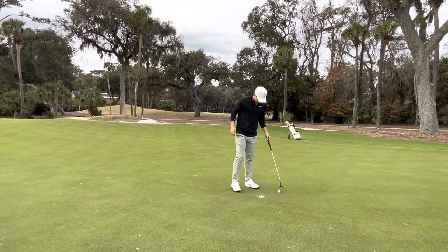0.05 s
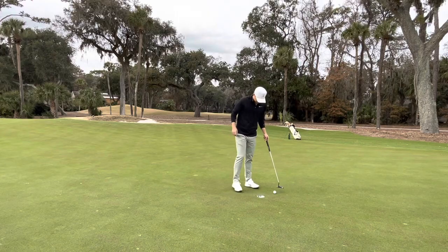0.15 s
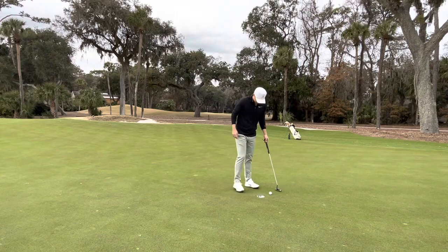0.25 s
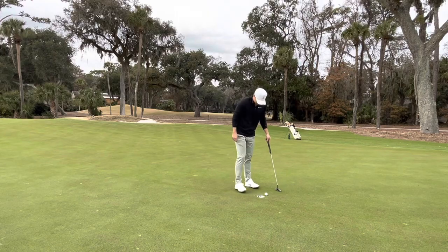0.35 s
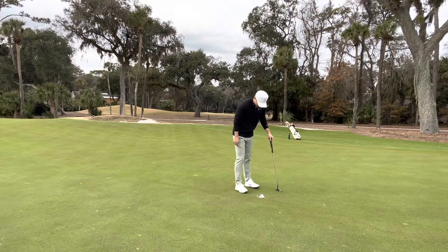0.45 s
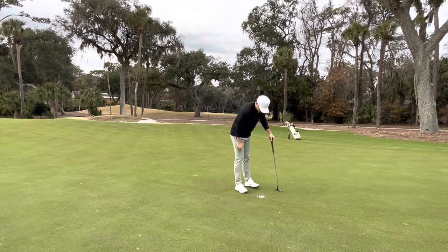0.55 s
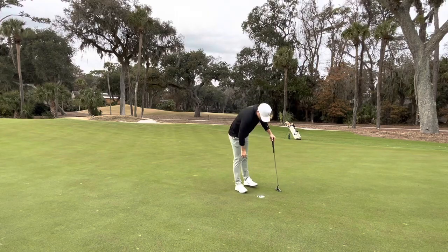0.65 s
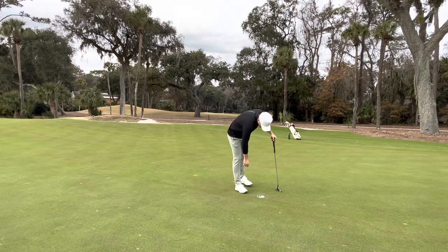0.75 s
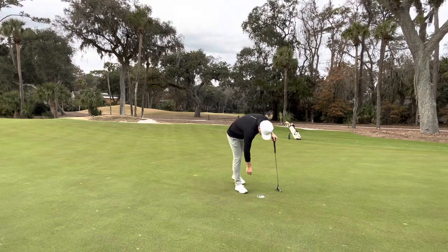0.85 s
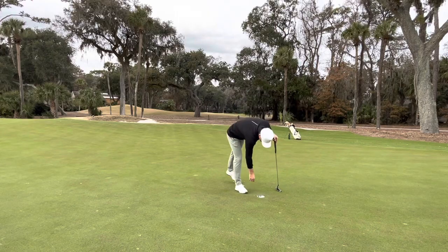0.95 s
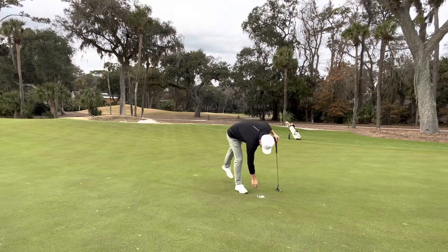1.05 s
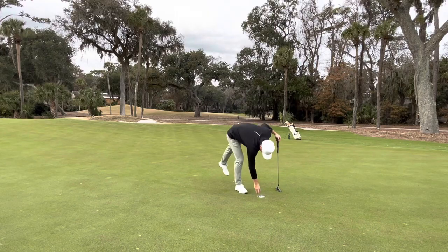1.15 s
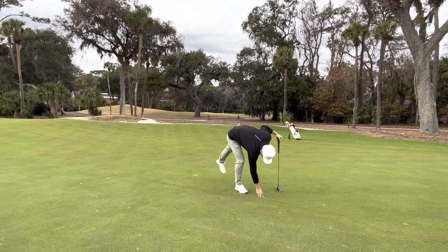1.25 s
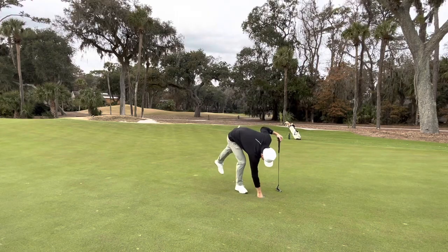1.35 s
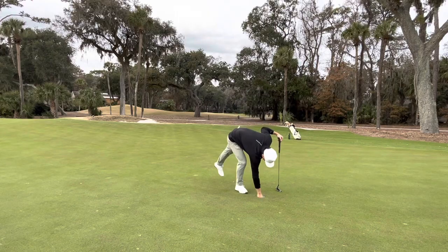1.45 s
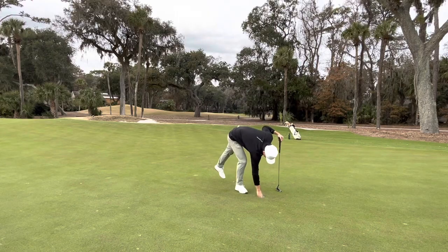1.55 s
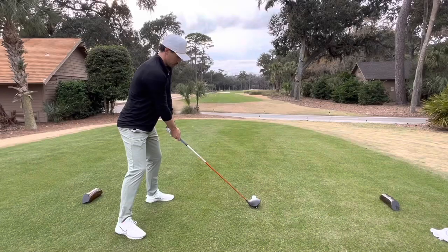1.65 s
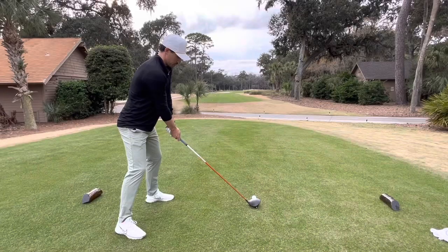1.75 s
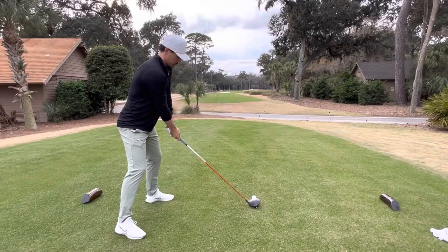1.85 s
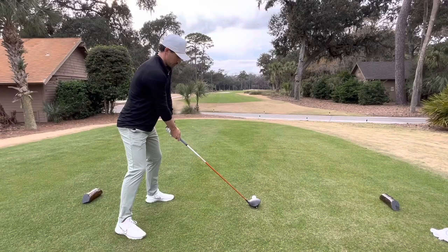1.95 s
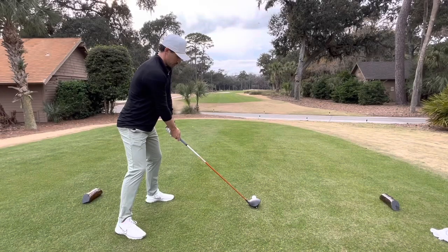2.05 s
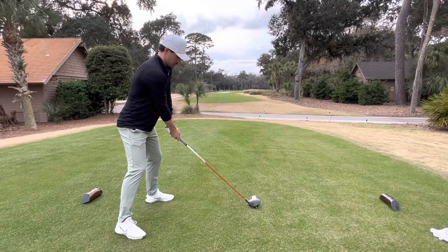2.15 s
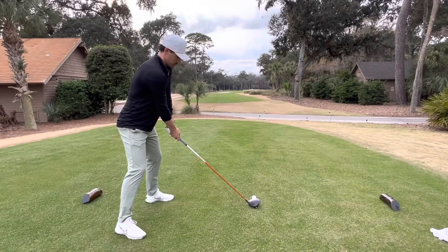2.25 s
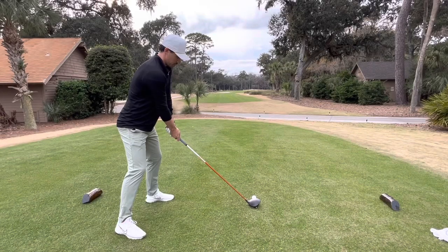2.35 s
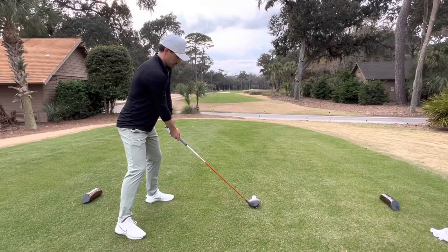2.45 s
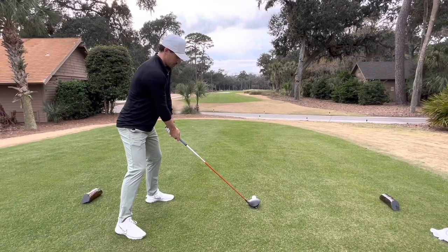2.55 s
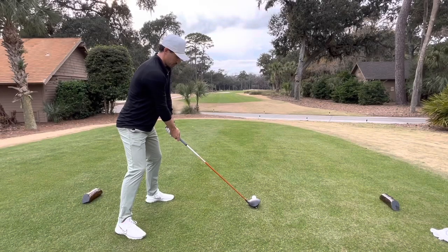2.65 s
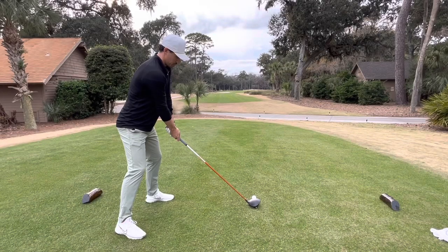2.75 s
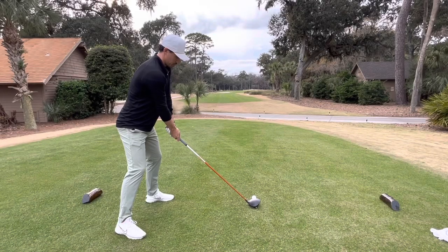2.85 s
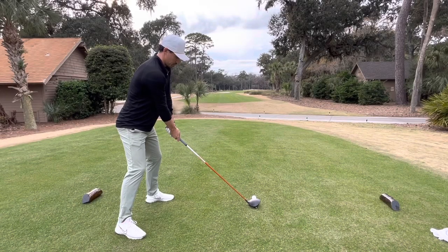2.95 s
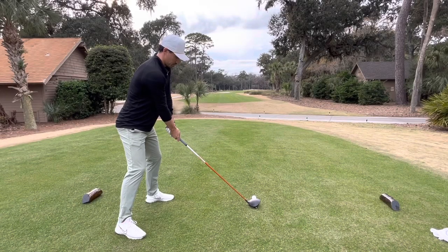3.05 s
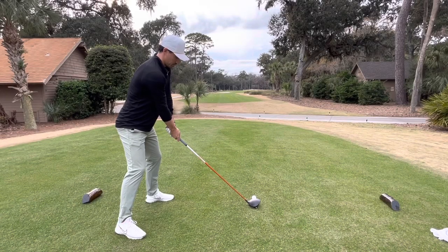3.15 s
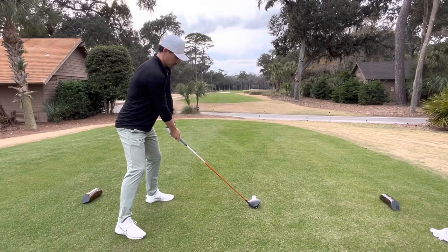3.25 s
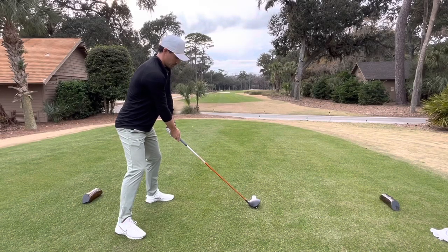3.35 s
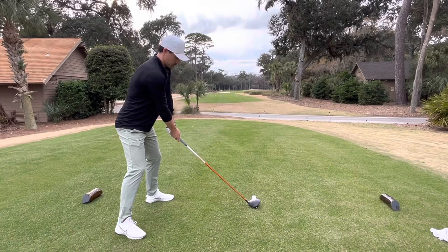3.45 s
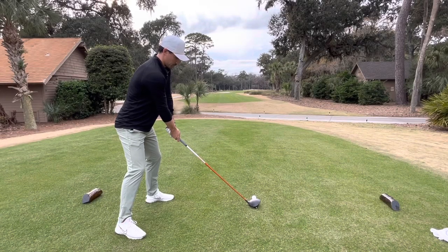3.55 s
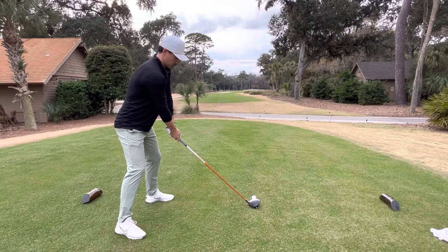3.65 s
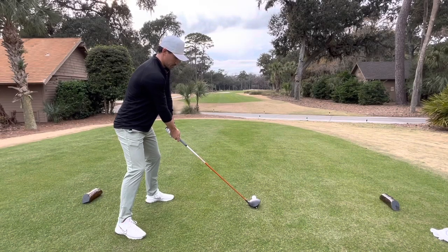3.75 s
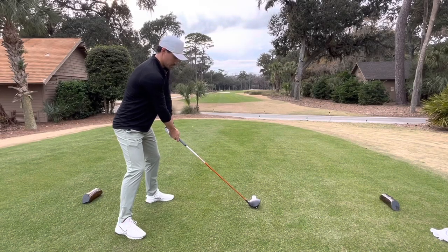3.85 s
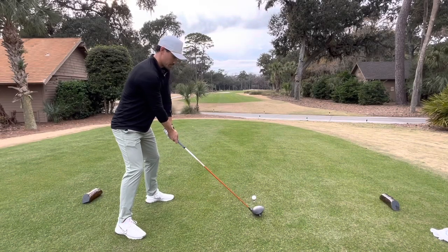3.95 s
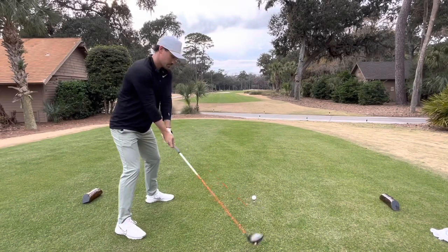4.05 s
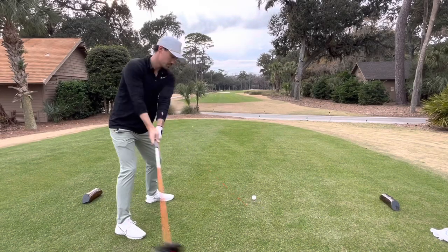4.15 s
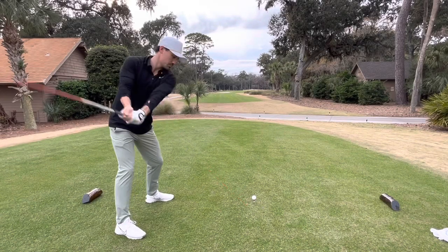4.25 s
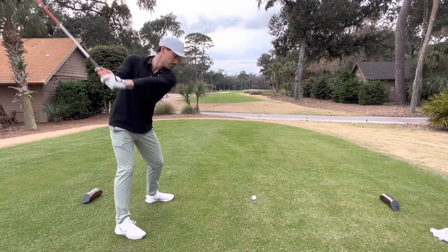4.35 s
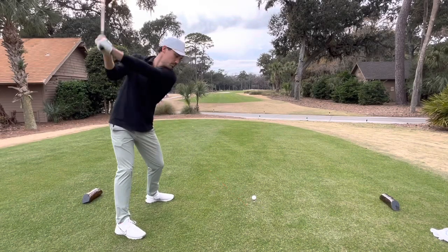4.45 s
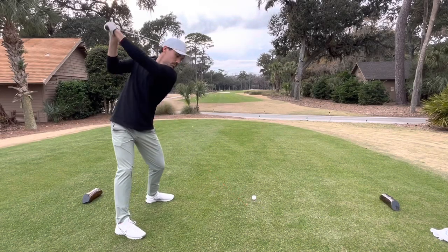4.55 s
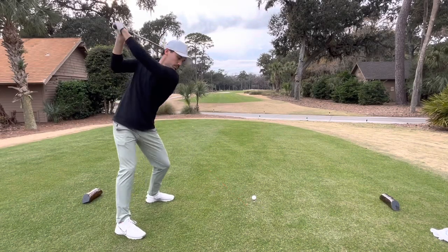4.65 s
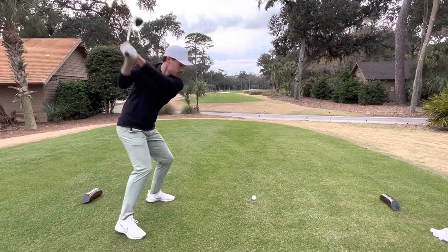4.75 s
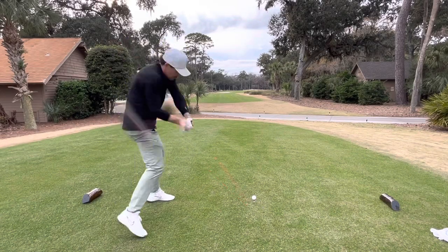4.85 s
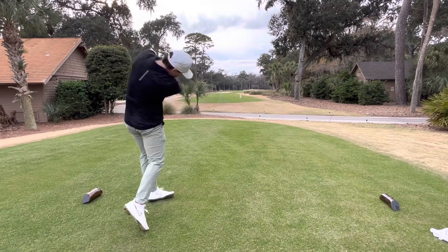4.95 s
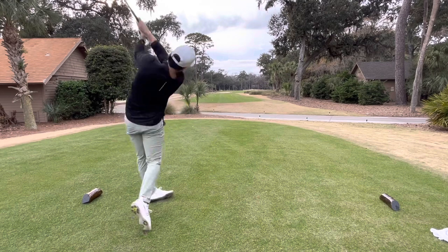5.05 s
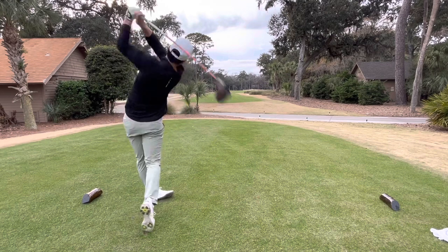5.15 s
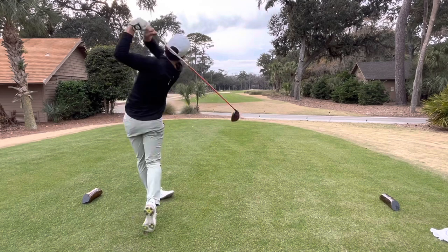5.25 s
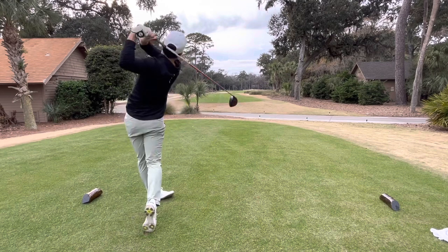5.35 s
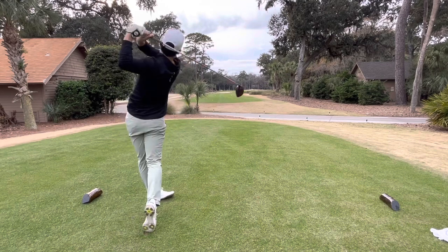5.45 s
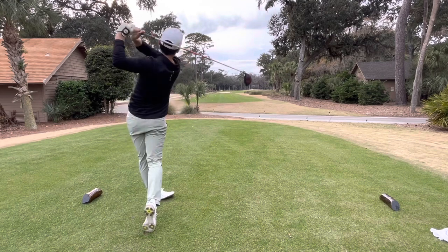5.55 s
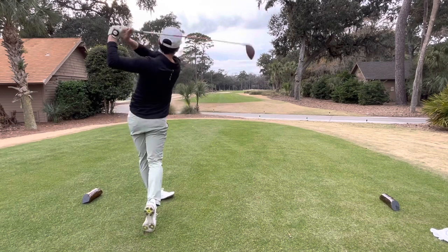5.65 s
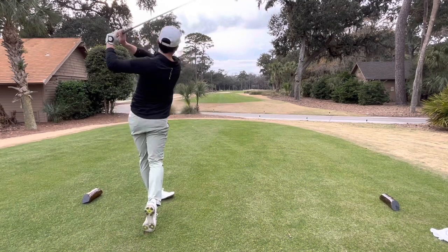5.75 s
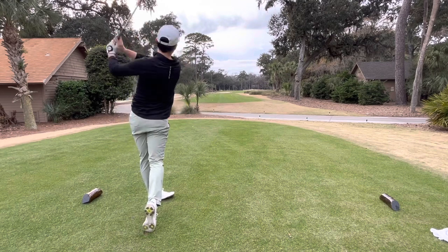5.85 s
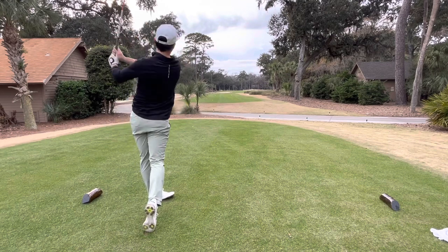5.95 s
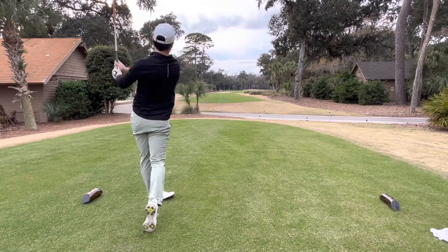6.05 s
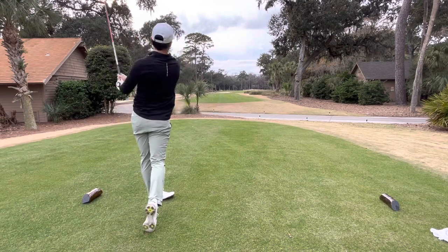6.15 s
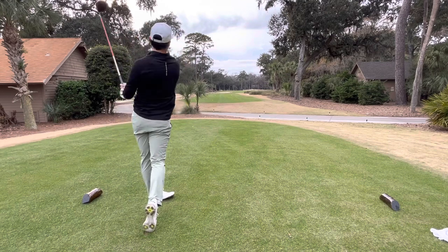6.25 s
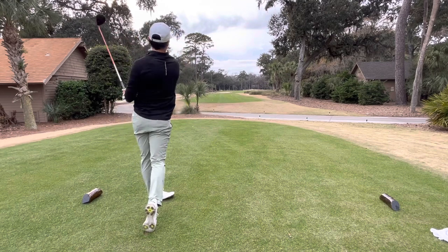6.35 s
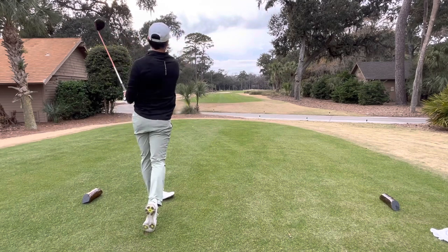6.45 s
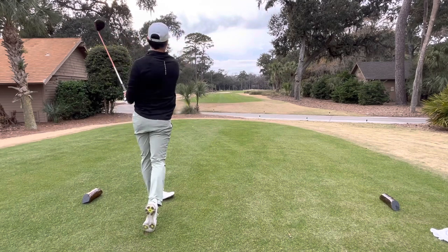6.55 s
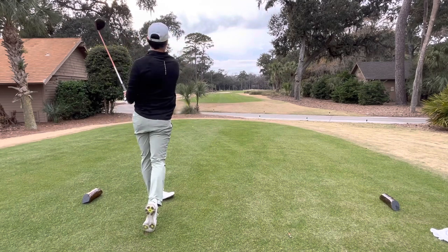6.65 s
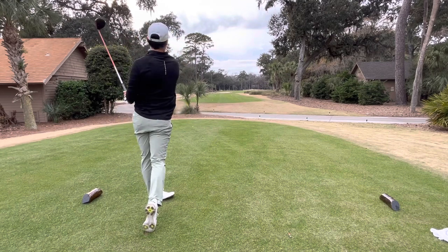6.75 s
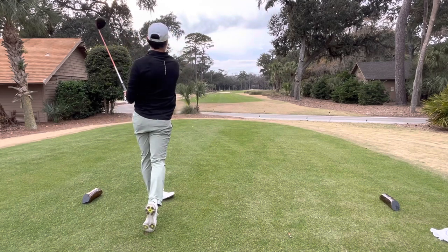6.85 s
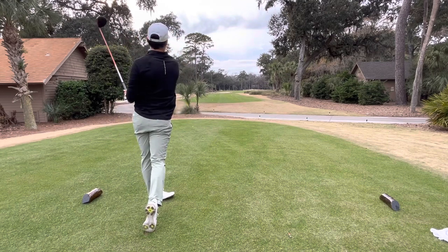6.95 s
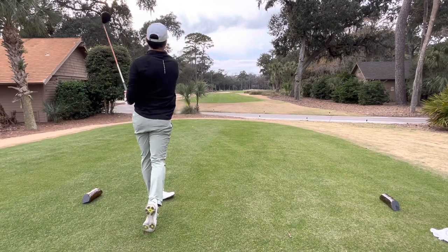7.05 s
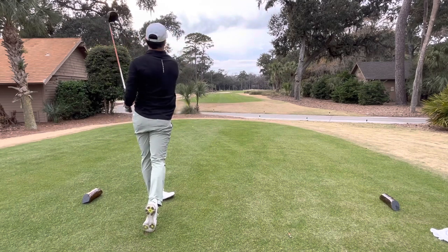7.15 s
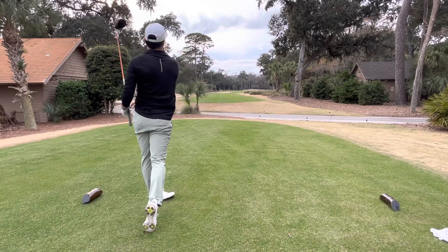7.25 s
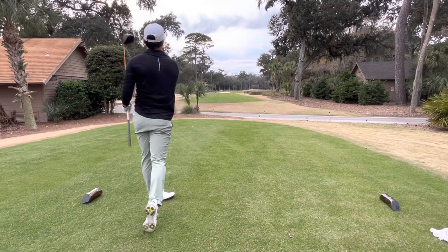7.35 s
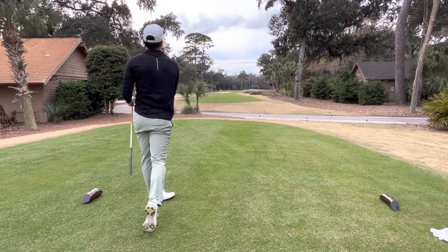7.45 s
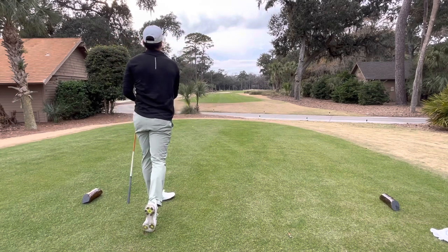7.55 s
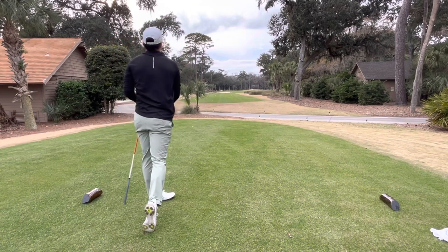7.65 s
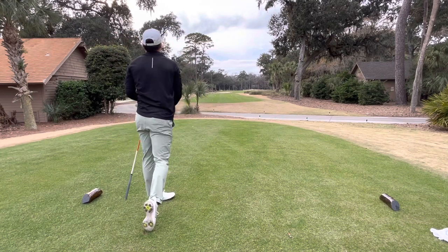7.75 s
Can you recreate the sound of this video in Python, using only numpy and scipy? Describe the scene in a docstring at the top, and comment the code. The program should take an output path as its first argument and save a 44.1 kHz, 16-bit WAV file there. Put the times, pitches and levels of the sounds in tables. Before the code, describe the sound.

From 0 s, a quiet open green: soft bass-heavy air and faint bird chirps. At about 0.5 s a ball hits the cup, rattling hollowly in quick uneven knocks, some bright, later ones duller, fading by 1.2 s. Cloth rustles as the player stoops, strongest around 0.8 s; a tiny high peep comes near 1.36 s. At 1.62 s the sound dips swiftly to silence and returns at a tee, with low air and a faint steady motor hum, slowly beating. Chirps and trills continue, with dull crackly distant knocks from 2.4 to 4.5 s. At 4.8 s a brief rising swish whistles down into an extremely loud, sharp metallic crack at 4.92 s. The background ducks momentarily; grainy echoes return in waves, fading within about a second. Further far knocks follow from 5.8 to 7.6 s, with sparse birds, and light cloth rustling after 7 s over the hum.

```python
"""A golf driver swishes down and cracks the ball on a tee, and the crack echoes off walls and trees.
The club is a vortex whistle and rushing noise; the crack is a burst of head modes, its echoes grainy noise.
Before it, on a green, a putted ball rattles in the cup's modes and the player stoops in rustling cloth.
The sound fades out and in to the tee, where a motor hums in steady tones and far knocks ring as crackly
noise. Birds call in gliding tones in both places. A gain control ducks after the crack and recovers."""
import sys
import numpy as np
from scipy import signal
from scipy.fft import rfft, irfft, next_fast_len
from scipy.io import wavfile
from scipy.ndimage import uniform_filter1d, minimum_filter1d

SR = 44100
rng = np.random.default_rng(int(sys.argv[2]) if len(sys.argv) > 2 else 0)


def generate_wav(signal):
    """Clip the signal to [-1, 1] and save it as 16-bit WAV at the path in sys.argv[1]."""
    frames = np.transpose(np.atleast_2d(signal))
    scaled = np.clip(frames, -1, 1) * 32767
    pcm = np.round(scaled).astype(np.int16)
    wavfile.write(sys.argv[1], SR, pcm)


N = 344112

STRIKE_S = 4.9172
# stereo lean of the hum and all coloured noise: pitch_hz, left_minus_right_db
LEAN = [(60, -2.5), (150, -5), (380, -2), (950, 1.5), (2380, 2), (5980, 6.5), (15000, -7.5)]
# bird notes, one table for each kind, and one short two-tone click at .263 s among the peeps:
# start_s, length_s, middle_hz, level_db, left_minus_right_db
FLICKS = [(1.667, .0053, 5100, -79, 11), (6.301, 0.0057, 5300, -71, 10)]
CHIPS = [(1.673, 0.016, 5580, -62.5, 9), (1.908, 0.014, 4870, -75.5, 6), (2.977, 0.013, 4040, -72.5, 10),
         (3.02, 0.0082, 3950, -69, 7), (3.898, .0071, 5530, -69, 9), (3.962, .025, 5640, -67, 11),
         (6.306, 0.023, 5520, -62.5, 10.5)]
DROPS = [(1.354, .017, 7100, -72, -14), (2.773, .035, 7120, -64.5, 5), (5.975, 0.059, 2340, -73, -6.5)]
TRILLS = [(1.39, .15, 6840, -78, -8), (2.45, 0.18, 6870, -72, 9), (2.808, 0.16, 6880, -71.5, 8),
          (3.17, 0.4, 6900, -73, 3), (3.587, .185, 7000, -74.5, 4)]
WARBLES = [(.04, .18, 3620, -80, 2), (.298, 0.134, 2760, -72, -2)]
ARCS = [(1.7, .115, 1490, -74.5, 0), (2.115, 0.11, 1465, -71.5, 0)]
PEEPS = [(.29, 0.031, 6480, -82, 4), (.263, 0.0081, 2410, -68, 0), (.263, 0.0062, 3250, -73, -3),
         (.26, 0.035, 5950, -84, 4), (1.173, .016, 6730, -71, -3), (1.362, 0.011, 6710, -56, 0),
         (1.55, .022, 5124, -75, -3), (2.357, 0.018, 6600, -80, 9), (2.892, .031, 3520, -74, 2),
         (2.986, 0.016, 5020, -71, 15), (5.723, 0.035, 1990, -75.5, -6), (6.2, .02, 2750, -81, 5),
         (6.478, 0.045, 7270, -65.5, 4.5), (6.523, 0.082, 7400, -80, -1), (7.595, .025, 4020, -77, 7)]
RASPS = [(.98, .32, 1702, -74, -5.5), (.432, 0.032, 5030, -70, 0), (.432, .035, 4150, -78, -2),
         (1.366, 0.037, 5300, -79, 6), (2.78, 0.14, 1980, -80.5, 0), (6.72, 0.2, 1947, -77.5, -1)]
BUZZES = [(0, 0.13, 4850, -77, 0), (.12, 0.075, 4950, -71.5, 0), (3.068, .035, 3250, -73, 1),
          (3.095, 0.17, 3580, -69.5, 3)]
CHURRS = [(.19, .06, 5250, -77, 0), (3.115, 0.13, 5050, -78.5, 19), (1.1, 0.231, 1300, -71.5, 2)]


def from_db(db):
    """Decibels to gain."""
    return 10 ** (np.asarray(db, float) / 20)


def rms_one(x):
    """Scale to rms 1."""
    return x / np.sqrt(np.mean(x ** 2) + 1e-20)


def at_hz(points, hz):
    """Read a (pitch_hz, value) table on a log frequency axis."""
    points = np.array(points)
    return np.interp(np.log(hz), np.log(points[:, 0]), points[:, 1])


def drift(rate_hz, size=N):
    """Random wander of spread 1: low-passed noise, made at every 40th sample and joined by lines."""
    r = np.exp(-80 * np.pi * rate_hz / SR)
    noise = rng.standard_normal(N // 40 + 2002)
    slow = signal.lfilter([1], [1, -2 * r, r * r], noise)[2000:]   # skip the filter's start
    return np.interp(np.arange(size) / 40, np.arange(len(slow)), rms_one(slow))


def sides(x, lean_db):
    """Place a sound by its left-minus-right level."""
    return x * from_db([[lean_db / 2], [-lean_db / 2]])


def add(out, x, s):
    """Mix a stereo piece in at a time in seconds."""
    i = round(s * SR)
    out[:, i:i + x.shape[1]] += x[:, :N - i]


def swell(s, rise_s, hold_s, fall_db_s, db):
    """Gain that climbs 30 dB to its level, holds, then falls steadily in dB."""
    t = np.arange(N) / SR - s
    climb_db = 30 * np.minimum(t / rise_s - 1, 0)
    fall_db = fall_db_s * np.maximum(t - rise_s - hold_s, 0)
    return (t > 0) * from_db(db + climb_db - fall_db)


def resonances(x, table):
    """Parallel (pitch_hz, width_hz, level_db) peaks, each applied twice for steep flanks."""
    out = 0
    for hz, width_hz, db in table:
        peak = signal.iirpeak(hz, hz / width_hz, SR)
        out = out + from_db(db) * signal.lfilter(*peak, signal.lfilter(*peak, x))
    return out


def coloured(spectrum, patchy_db=0, rate_hz=5):
    """Diffuse stereo noise of rms 1 with a given spectrum, whose bands can swell and sink on their own."""
    # how alike left and right are: pitch_hz, likeness (1 equal, 0 unrelated, -1 opposite)
    likeness = [(60, 1), (180, 0.041), (550, -0.66), (1650, -0.1), (4970, 0.16), (15000, -0.25)]
    # centres of the bands that swell on their own: pitch_hz
    patch_hz = [60, 150, 350, 700, 1100, 1700, 2500, 3600, 5000, 7000, 10000, 14000]
    size = next_fast_len(N)
    hz = np.maximum(np.fft.rfftfreq(size, 1 / SR), 1)
    mid, side = rfft(rng.standard_normal((2, size))) * from_db(at_hz(spectrum, hz))
    alike = np.clip(at_hz(likeness, hz), -1, 1)
    pair = np.sqrt(1 + alike) * mid + np.sqrt(1 - alike) * side * [[1], [-1]]
    pair = pair * from_db(at_hz(LEAN, hz) * [[.5], [-.5]])
    if not patchy_db:
        return rms_one(irfft(pair, size)[:, :N])
    out = 0
    for row in np.eye(len(patch_hz)):
        band = np.interp(np.log(hz), np.log(patch_hz), row)   # overlapping bands that sum to 1
        out = out + irfft(pair * band, size)[:, :N] * from_db(patchy_db * drift(rate_hz))
    return rms_one(out)


def open_air(x, wet_db, t60):
    """Scatter from trees: a dying noise tail, own in each channel, added to the sound."""
    t = np.arange(round(t60 * SR)) / SR
    tail = rng.standard_normal((2, len(t))) * from_db(-60 * t / t60)
    tail = tail / np.sqrt(np.sum(tail[0] ** 2))
    return x + from_db(wet_db) * signal.fftconvolve(x, tail, axes=1)[:, :N]


def green_air():
    """Air of the green: diffuse noise, heaviest in the bass."""
    # spectrum: pitch_hz, relative_db_per_hz
    spectrum = [(15, -29), (30, -30), (55, 0.5), (86, -1.5), (144, -11.5), (198, -12), (281, -25),
                (360, -22.5), (482, -30.5), (900, -36), (1600, -43), (2400, -48.5), (5140, -51.5),
                (11300, -63.5), (12200, -73)]
    return from_db(-51) * coloured(spectrum, patchy_db=1.0, rate_hz=3.9)


def tee_air():
    """Air of the tee: diffuse noise, heaviest in the bass, a little patchier."""
    # spectrum: pitch_hz, relative_db_per_hz
    spectrum = [(15, -40), (30, -16), (55, 2.5), (85, -1), (164, -10.5), (246, -13.5), (290, -17),
                (400, -13.5), (480, -15), (614, -24), (1300, -33), (2300, -41.5), (5140, -47), (11300, -57),
                (12200, -72)]
    return from_db(-53.5) * coloured(spectrum, patchy_db=1.6, rate_hz=2.4)


def hum():
    """An induction motor: shaft harmonics and mains tones beat slowly at the slip rate."""
    # motor tones: multiple_of_shaft, multiple_of_mains, level_db (rms, before wander and lean)
    tones = [(1, 0, -74.5), (2, 0, -59), (3, 0, -59), (4, 0, -61.5), (5, 0, -62.5), (6, 0, -69),
             (7, 0, -79), (8, 0, -68), (10, 0, -84), (11, 0, -73), (12, 0, -76), (13, 0, -83),
             (14, 0, -75.5), (15, 0, -69), (16, 0, -70.5), (17, 0, -83), (18, 0, -90), (19, 0, -90),
             (0, 1, -73), (1, 1, -66), (2, 1, -70), (3, 1, -81), (4, 1, -71.5), (0, 2, -76.5), (0, 3, -68)]
    shaft_hz, mains_hz = 29.66, 119.96   # shaft turns, twice the supply frequency
    t, out = np.arange(N) / SR, 0
    for shaft, mains, db in tones:
        hz = shaft * shaft_hz + mains * mains_hz
        tone = np.sqrt(2) * np.sin(2 * np.pi * (hz * t + rng.random()))
        level = from_db(db + 1.1 * drift(9.1))
        out = out + sides(tone * level, at_hz(LEAN, hz))
    return out


def birds():
    """Gliding whistles and one click: hoarse ones shake in pitch, trills pulse in level; some scatter."""
    # kinds of note: notes, start_ratio and end_ratio (pitch over middle), hoarseness_hz, trill_per_s,
    # drop_hz (from the high to the low note of a trill), echo_db
    kinds = [(FLICKS, 0.61, 1.18, 30, 0, 0, 0), (CHIPS, 1.2, 0.81, 150, 0, 0, 0),
             (DROPS, 1.14, .94, 110, 0, 0, 0), (TRILLS, 1.03, 1.01, 120, 31, 790, -1),
             (WARBLES, 0.94, 1.1, 140, 54, 0, 0), (BUZZES, .99, 1.0, 90, 70, 0, -3),
             (CHURRS, 0.87, 1, 290, 77, 0, 0), (ARCS, .78, 0.81, 35, 0, 0, 2),
             (PEEPS, 1, 0.97, 59, 0, 0, 0), (RASPS, 0.97, 0.95, 200, 0, 0, 0)]
    out, far = np.zeros((2, 2, N))
    for notes, start, end, hoarse_hz, trill, drop_hz, echo_db in kinds:
        for s, length, hz, db, lean_db in notes:
            t = np.arange(round(length * SR)) / SR
            u = t / length
            # a parabola through the start, middle and end pitch
            glide = start * (1 - u) * (1 - 2 * u) + 4 * u * (1 - u) + end * u * (2 * u - 1)
            pitch = hz * glide - drop_hz * ((trill * t + .5) % 1 - .5)
            shake = rms_one(uniform_filter1d(rng.standard_normal(20000), size=40))[:len(t)]
            note = np.sin(2 * np.pi * np.cumsum(pitch + hoarse_hz * shake) / SR)
            # a trill that drops pulses twice a cycle, once for each of its notes
            pulse = np.sin(2 * np.pi * trill * t) if drop_hz else np.cos(np.pi * trill * t)
            note *= np.sin(np.pi * u) ** 0.54 * np.abs(pulse) ** 2.0
            add(out, sides(from_db(db) * note[None], lean_db), s)
            add(far, sides(from_db(db + echo_db) * note[None], lean_db), s)
    scatter = open_air(far, wet_db=0, t60=0.16) - far
    return out + scatter


def knocks():
    """Far blows, smeared by distance into short crackly bursts through a few resonances."""
    # blows: start_s, level_db, t60_s, lowest_resonance_db, second_resonance_db
    blows = [(2.426, -58.5, .15, 2, 6), (3.371, -56, 0.14, 7.5, 5), (3.59, -56.5, 0.14, 10.5, 6),
             (3.811, -52.5, 0.13, 4, -2), (4.451, -53, 0.17, 6.5, 0), (5.816, -62.5, 0.16, 8, 8),
             (5.924, -54.5, .15, 7, 6), (6.503, -57, 0.21, 6.5, -2), (7.077, -54, 0.11, -4, 4),
             (7.134, -70.5, 0.18, 15, 4.5), (7.574, -52.5, 0.041, 19, -8)]
    # resonances: pitch_hz, width_hz, level_db
    peaks = [(1269, 108, 12), (2130, 300, 7.5), (2480, 900, 4.5), (3815, 1000, 7), (4453, 940, 10.5),
             (5250, 900, 0), (5930, 490, 2)]
    taps_per_s, spread_db = 1100, 2.5   # uneven taps in a blow; resonances vary from blow to blow
    low_hold_s, low_t60_s = 0.029, 0.11   # the two lowest resonances get this extra damping
    (out, low), t = np.zeros((2, 2, N)), np.arange(9000) / SR
    damped = from_db(-60 * np.maximum(t - low_hold_s, 0) / low_t60_s)
    for s, level_db, t60, low_db, second_db in blows:
        tap_db = 4.0 * np.minimum(rng.exponential(1, len(t)), 4)
        taps = from_db(tap_db) * (rng.random(len(t)) < taps_per_s / SR)
        grain = rms_one(1 + 0.74 * rms_one(signal.lfilter([1], [1, -.95], taps)))
        envelope = np.minimum(t / 0.015, 1) * from_db(level_db - 60 * t / t60)
        burst = rng.standard_normal((2, len(t))) * grain * envelope
        own_db = rng.normal(0, spread_db, len(peaks))
        own_db[:2] += [low_db, second_db]
        ring = [(hz, width_hz, db + own) for (hz, width_hz, db), own in zip(peaks, own_db)]
        add(out, resonances(burst, ring[2:]), s)
        add(low, resonances(burst, ring[:2]) * damped, s)
    dulled = signal.sosfilt(signal.butter(4, 6900, fs=SR, output="sos"), out)
    return open_air(dulled, wet_db=-3.5, t60=.4) + open_air(low, wet_db=-5.5, t60=.3)


def rustle():
    """Cloth and soles rub: noise made grainy by many tiny uneven slips; smooth fabric sizzles higher."""
    # spectrum of the rub: pitch_hz, relative_db_per_hz
    cloth = [(500, -10.5), (900, -3), (1400, -0.5), (2400, -6), (7700, -16.5), (9500, -13), (11400, -19),
             (12300, -61), (14000, -32), (16000, -32)]
    # clothes and shoes moving: start_s, rise_s, hold_s, fall_db_per_s, level_db, extra_sizzle_db
    moves = [(0.396, 0.077, .8, 55, -70.5, -0.5), (0.612, 0.19, .12, 258, -55.5, -22),
             (0.928, .035, 0.026, 500, -62, -10), (3.9, 0.19, 0.4, 120, -74, 5.5),
             (4.52, 0.16, 0.25, 300, -70, 4.5), (6.979, 0.15, .02, 183, -69, 3.5),
             (7.37, 0.048, .005, 200, -73, 5.5), (7.449, 0.12, 0.0093, 180, -77, 5.5),
             (7.548, 0.2, 0.054, 99.5, -71.5, 2)]
    slip_db = 3.6 * np.minimum(rng.exponential(1, N), 4)
    slips = from_db(slip_db) * (rng.random(N) < 900 / SR)   # 900 slips a second on average
    grain = 1 + .5 * rms_one(signal.lfilter([1], [1, -.99], slips))
    rub = rms_one(grain * coloured(cloth))
    sizzle = signal.sosfilt(signal.butter(2, 7500, "high", fs=SR, output="sos"), rub)
    out = 0
    for *shape, sizzle_db in moves:
        out = out + swell(*shape) * (rub - sizzle + from_db(sizzle_db) * sizzle)
    return out


def cup():
    """Each touch strikes the cup's modes, most those near its own colour; low modes swell later."""
    # ball against the cup: start_s, level_db (peak of the ring before lean), favoured_hz
    touches = [(.53, -34.5, 690), (0.6102, -39, 3250), (0.6133, -41.5, 2900), (.654, -59, 4000),
               (.661, -32, 1140), (0.718, -40, 860), (0.809, -34.5, 590), (.901, -53, 3000),
               (0.921, -50, 500), (.968, -42, 764), (.996, -43, 724), (1.036, -44.5, 560),
               (1.073, -50.5, 520), (1.115, -50.5, 540), (1.237, -56, 8950)]
    # modes of the cup: pitch_hz, level_db, t60_s
    modes = [(342, -11, 0.087), (520, 10.5, 0.012), (986, -3.5, 0.02), (1410, -11, 0.028),
             (1515, -10.5, 0.025), (2270, -6.5, 0.02), (2320, -13.5, .013), (3280, -10, 0.0084),
             (3580, -7, 0.015), (4100, -13, .009), (4400, -13, 0.0099), (5100, -16, 0.009),
             (8050, -22, .006)]
    out, t = np.zeros((2, N)), np.arange(3000) / SR
    tick_band = signal.butter(2, [2000, 11500], "band", fs=SR)
    for s, level_db, near_hz in touches:
        # bright touches tick more and lean further left
        octaves = np.log2(near_hz / 1000)
        tick_db, lean_db = -29.5 + 9 * octaves, -4.5 + 3.0 * octaves
        ring = 0
        for hz, db, t60 in modes:
            mode_db = db - 5.3 * np.log2(hz / near_hz) ** 2 + rng.normal(0, 3.3)
            envelope = from_db(mode_db - 60 * t / t60) * np.minimum(t * hz / 0.87, 1)
            ring = ring + envelope * np.sin(2 * np.pi * hz * rng.normal(1, 0.026) * t)
        tick = signal.lfilter(*tick_band, rng.standard_normal(len(t)))
        touch = ring / np.abs(ring).max() + from_db(tick_db - 60 * t / 0.021) * tick
        add(out, sides(from_db(level_db) * touch, lean_db), s)
    return open_air(out, wet_db=-18, t60=.06)


def swing():
    """The shaft sheds vortices at a pitch that follows its speed; the wider head sheds lower; air rushes."""
    # downswing: time_s, club_speed_m_per_s, whistle_db, rush_db
    downswing = [(4.799, 22.8, -62, -67), (4.826, 30, -66, -66), (4.839, 27.5, -44.5, -55),
                 (4.851, 32, -41, -47), (4.866, 41, -30, -37), (4.875, 47.7, -29, -37.5),
                 (4.894, 48.5, -29.5, -35), (4.901, 46, -39, -33), (4.906, 43, -32.5, -35.5),
                 (4.916, 40, -27, -32), (4.926, 42, -45.5, -40.5), (4.95, 21, -69, -56.5),
                 (5.0, 25, -100, -86.5)]
    # vortex streets: pitch_ratio_to_shaft, level_db, wander_hz, behind_shaft_s, steady_share (against wander)
    streets = [(1.0, -4, 67, 0.00023, 1.3), (.48, -6, 50, .014, 0.8), (.7, -8, 80, .004, 0.42),
               (1.5, -17, 200, 0.0019, .3), (.24, -15, 50, .014, 0.25)]
    # spectrum of the rushing air: pitch_hz, relative_db_per_hz
    rush_spectrum = [(59, -46.5), (100, -24.5), (394, -9), (576, -10), (1160, -5), (5500, -17.5),
                     (7200, -23.5), (10600, -22.5), (12500, -35), (16000, -32.5)]
    strouhal, shaft_m = .2, .01   # vortices are shed at strouhal * speed / shaft width
    t = np.arange(N) / SR
    s, speed, whistle_db, rush_db = np.transpose(downswing)
    whistle = 0
    for ratio, db, wander_hz, behind_s, steady in streets:
        shed_hz = ratio * strouhal * np.interp(t - behind_s, s, speed) / shaft_m
        turn = 2 * np.pi * np.cumsum(shed_hz) / SR
        shared = (steady + drift(wander_hz)) * np.cos(turn) + drift(wander_hz) * np.sin(turn)
        opposed = drift(wander_hz) * np.cos(turn) * [[1], [-1]]   # opposite in left and right
        whistle = whistle + from_db(db) * (shared + 0.67 * opposed)
    whistle = sides(whistle, lean_db=-2) * from_db(np.interp(t, s, whistle_db))
    rush = coloured(rush_spectrum) * from_db(np.interp(t, s, rush_db))
    heard = (t > s[0]) & (t < s[-1])
    return heard * (whistle + rush)


def echoes():
    """The crack returns as a grainy wash in a few waves; treble and middle die at their own pace."""
    # spectrum of the wash: pitch_hz, relative_db_per_hz
    colour = [(240, -19.5), (400, -3), (466, 0.5), (511, 0), (834, 0), (2200, -8), (3650, -15.5),
              (4300, -5.5), (4750, -7), (5250, -3.5), (5900, -0.5), (6400, -4.5), (6900, -5.5), (7600, -15),
              (9000, -9.5), (10900, -17), (11800, -35), (12300, -63), (13500, -35), (15500, -30.5)]
    # returns from walls and trees: after_strike_s, treble_db, middle_db
    returns = [(0.046, -37, -45.5), (.1, -45, -54), (.15, -59, -42.5), (.2, -66, -54), (.245, -51.5, -61),
               (.335, -60, -56), (.44, -71.5, -78)]
    rise_s, treble_fall_db_s, middle_fall_db_s = 0.017, 90, 128.5
    wash = coloured(colour, patchy_db=2.5, rate_hz=18)
    treble = signal.sosfilt(signal.butter(4, 3300, "high", fs=SR, output="sos"), wash)
    middle = signal.sosfilt(signal.butter(4, 3300, "low", fs=SR, output="sos"), wash)
    # overlapping returns add as powers; the middle also lingers among the trees
    treble_power = 0
    middle_power = swell(STRIKE_S + returns[0][0], rise_s, 0, fall_db_s=32, db=-45.5) ** 2
    for s, treble_db, middle_db in returns:
        treble_power = treble_power + swell(STRIKE_S + s, rise_s, 0, treble_fall_db_s, treble_db) ** 2
        middle_power = middle_power + swell(STRIKE_S + s, rise_s, 0, middle_fall_db_s, middle_db) ** 2
    return np.sqrt(treble_power) * rms_one(treble) + np.sqrt(middle_power) * rms_one(middle)


def strike():
    """The crack: head modes burst almost together, lows a little late; the shell shivers."""
    # club head modes: pitch_hz, left_db, right_db, left_leads_rad, rise_t60_s, t60_s
    head = [(79, -35, -29, -1.5, 0.0095, 0.074), (396.7, -18, -18.5, -0.5, 0.00076, 0.0053),
            (980, -10.5, -6, 1, 0.0042, 0.0047), (1590, -19.5, -16.5, 1.04, 0.0017, 0.0048),
            (2430, -19, -15, 0.25, 0.0011, 0.0069), (2904, -19, -19.5, -1.7, 0.0038, 0.0077),
            (3730, -20, -18.5, -1, .002, 0.0046), (4200, -8, -12.5, -1, .003, 0.0056),
            (4930, -15, -20.5, -2, 0.011, 0.0096), (5770, -10.5, -14.5, 2, 0.012, 0.0049),
            (6950, -25.5, -19, 1.5, 0.014, .003), (7016, -26, -8, 5, .014, 0.0027),
            (8500, -27, -24, 5, 0.0024, 0.0035), (10000, -16, -14, 0.5, 0.00097, .005),
            (12690, -28, -29, -4, .002, .004), (15300, -24, -24.5, -1.5, 0.0027, 0.0045),
            (595, -42, -39, 0.5, .002, 0.19), (700, -44, -40.5, -2, .002, 0.18),
            (2024, -45, -47.5, -1.5, .002, 0.21), (2061, -49, -49.5, -0.5, .002, 0.28),
            (3116, -46.5, -49.5, 1, .002, 0.34), (3180, -50, -51, 0, .002, 0.23),
            (3330, -42, -44, -0.5, .002, 0.11), (4407, -32, -32.5, 1, .002, .06),
            (5145, -29.5, -33, -1, 0.0023, .04)]
    # the hollow head shivers, then its bounce off the ground arrives: after_strike_s, fall_db_per_s, level_db
    shivers = [(.0002, 2600, -24), (.009, 1100, -26), (.015, 900, -37)]
    # resonances of the shell: pitch_hz, width_hz, relative_db
    shell = [(2134, 550, -15), (3337, 600, -13.5), (4616, 600, 4.5), (5350, 720, 0.5), (5440, 790, -4),
             (7830, 410, -4.5), (11600, 5200, -13)]
    lead = 2000   # samples kept for the rise
    crack = 0
    for hz, left_db, right_db, leads, rise_t60, t60 in head:
        late_s = .0006 if hz < 1200 else 0
        t = (np.arange(8000) - lead) / SR - late_s
        envelope = from_db(60 * np.where(t < 0, t / rise_t60, -t / t60))
        if t60 > .03:   # the long rings are clusters of close modes, so they waver
            envelope = envelope * (1.2 + .7 * drift(70, size=8000))
        tone = np.sin(2 * np.pi * hz * t - np.array([[0], [leads]]))
        crack = crack + from_db([[left_db], [right_db]]) * envelope * tone
    shiver = sum(swell(STRIKE_S + s, .003, 0, fall_db_s, db) for s, fall_db_s, db in shivers)
    shell_noise = rms_one(resonances(rng.standard_normal((2, N)), shell))
    out = sides(shiver * shell_noise, lean_db=1)
    add(out, crack, STRIKE_S - lead / SR)
    return out


def scene():
    """A soft start, the green, a fade out and in, the tee."""
    cut_s, cut_fade_s = 1.622, 0.033
    t = np.arange(N) / SR
    place = np.where(t < cut_s, green_air(), tee_air() + hum())
    mix = place + birds() + knocks() + rustle() + cup() + swing() + echoes() + strike()
    cut_fade = np.minimum(np.abs(t - cut_s) / cut_fade_s, 1)
    return mix * cut_fade * np.minimum(t / 0.0018, 1)


def gain_control(x, knee_db, share, lag_s, hold_s, release_db_s, smooth_s):
    """Loud peaks pull the gain down a moment late, by a share of their excess; it holds, then climbs back."""
    level_db = 20 * np.log10(np.abs(x).max(0) + 1e-9)
    over_db = share * np.maximum(level_db - knee_db, 0)
    size = round(hold_s * SR)
    held = -minimum_filter1d(-over_db, size)   # running maximum
    held = np.pad(held, (size // 2 + round(lag_s * SR), 0))[:N]
    ramp = release_db_s * np.arange(N) / SR
    cut_db = np.maximum.accumulate(held + ramp) - ramp   # falls no faster than the release
    r = np.exp(-1 / (smooth_s * SR))
    return x * from_db(-signal.lfilter([1 - r], [1, -r], cut_db))


def record(dry):
    """Gain control, rounded peaks, then the top is cut."""
    steady = gain_control(dry, knee_db=-12.5, share=0.56, lag_s=0.0046, hold_s=0.18,
                          release_db_s=400, smooth_s=0.01)
    top = .76   # peaks bend smoothly towards this amplitude
    rounded = steady / (1 + np.abs(steady / top) ** 6) ** (1 / 6)
    # 70 dB down from 16.9 kHz up
    return signal.sosfilt(signal.cheby2(14, 70, 16900, fs=SR, output="sos"), rounded)


dry = scene()
out = record(dry)
generate_wav(out)
```